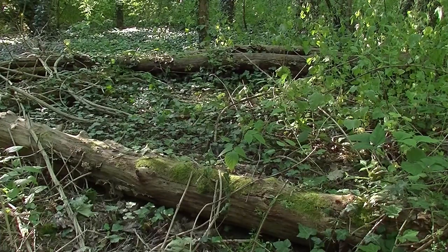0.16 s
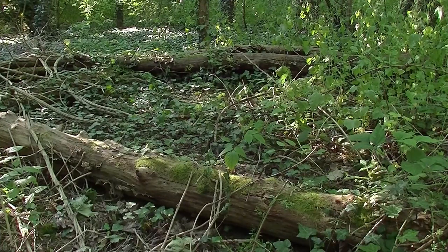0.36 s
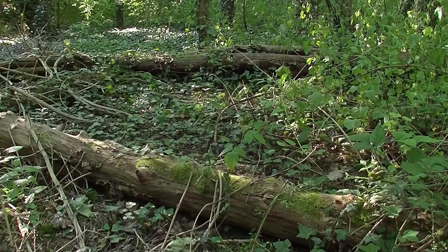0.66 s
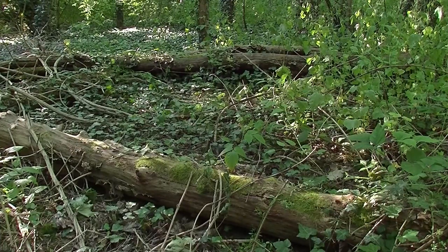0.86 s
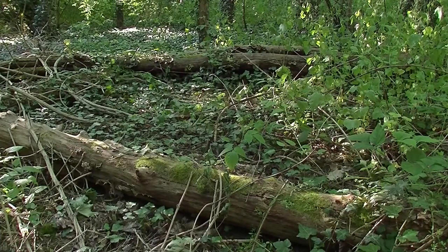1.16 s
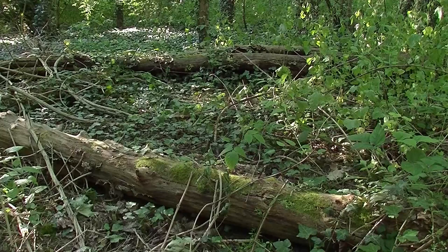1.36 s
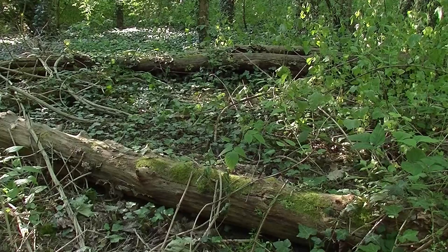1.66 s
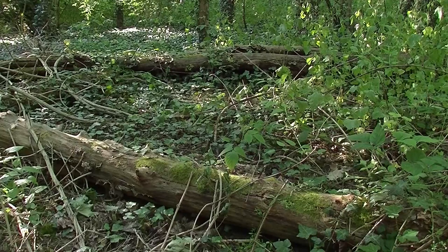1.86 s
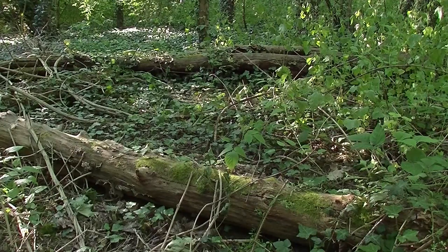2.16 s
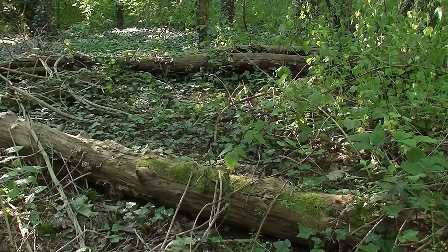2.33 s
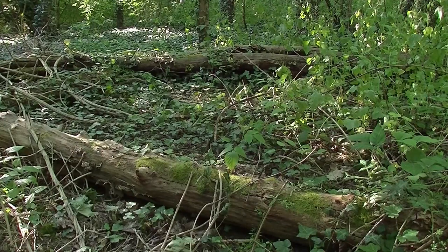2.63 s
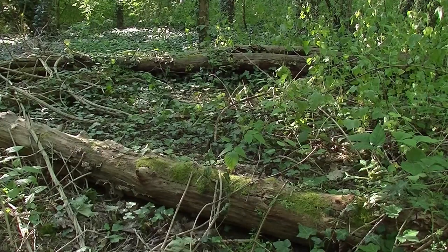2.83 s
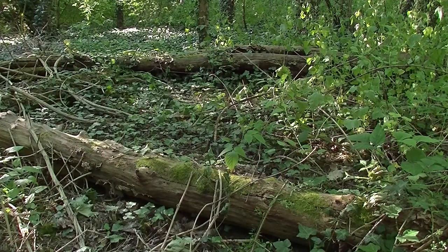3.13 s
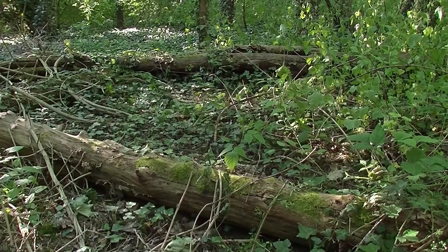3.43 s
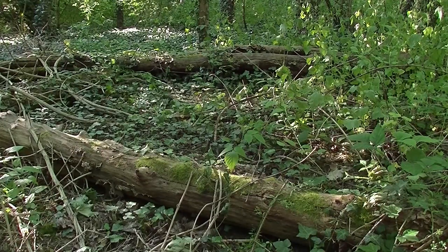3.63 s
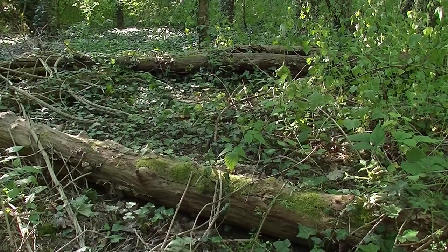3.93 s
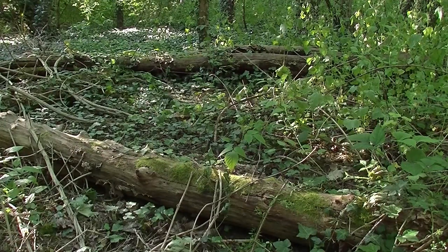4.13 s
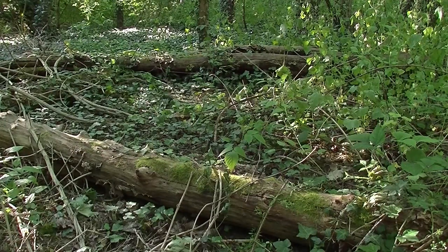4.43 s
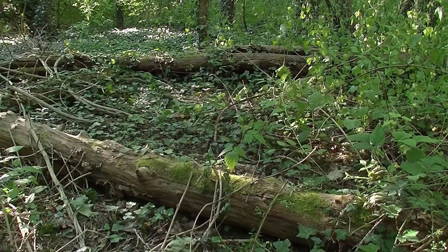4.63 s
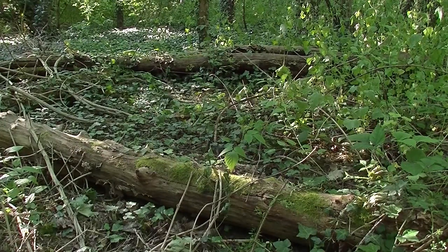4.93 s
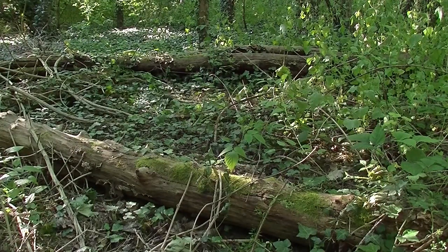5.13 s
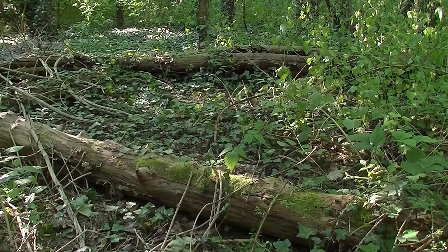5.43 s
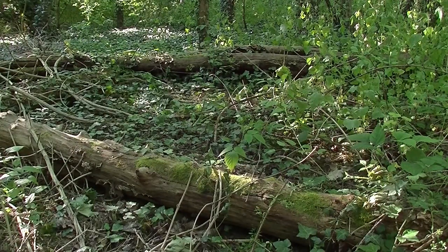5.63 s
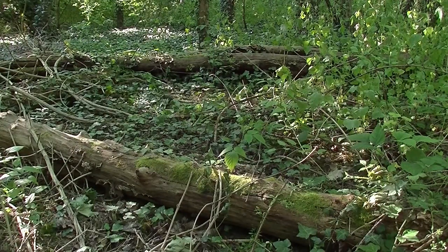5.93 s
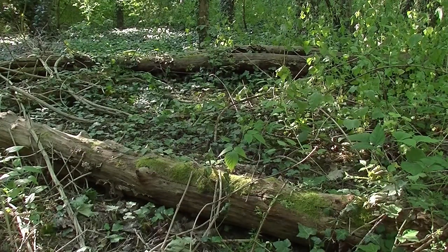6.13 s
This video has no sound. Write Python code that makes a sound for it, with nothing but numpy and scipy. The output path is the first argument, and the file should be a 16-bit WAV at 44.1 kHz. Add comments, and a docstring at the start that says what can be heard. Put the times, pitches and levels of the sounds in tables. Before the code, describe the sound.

A songbird trills some way off in a leafy wood over faint warbling, then a close bird chirps, buzzes and whistles above soft hush.

```python
"""Songbirds in a leafy wood

One bird trills some way off and fainter voices warble behind it; then a close bird chirps, buzzes and whistles.
Every note is a gliding sine with two faint overtones; quick pitch swings make the buzzes.
Random echoes stand for the trunks and leaves that scatter the notes into a tail.
Filtered noise makes a soft steady hush, and a high sine the camera's thin whine."""
import sys
import numpy as np
from scipy import signal
from scipy.fft import rfft, irfft
from scipy.io import wavfile
from scipy.ndimage import uniform_filter1d

SR = 44100
rng = np.random.default_rng(int(sys.argv[2]) if len(sys.argv) > 2 else 0)


def inscribe(sig):
    """Save sig as 16-bit PCM at rate SR to the path in sys.argv[1].

    A 1-D sig is mono; a 2-D sig holds one channel per row.
    Samples are clipped to [-1, 1] before scaling.
    """
    pcm = np.round(np.clip(np.atleast_2d(sig).T, -1, 1) * 32767)
    wavfile.write(sys.argv[1], SR, pcm.astype(np.int16))


N = 276948
TIME = np.arange(N) / SR  # s

# Note levels are source levels, ahead of fades, filtering, echoes and mix gains.
# Spectra list relative density; noise() evens out their overall level.

# Colour of the far hush: hz, density_db
HUSH_SPECTRUM = [(25, -25), (50, -10), (80, -4), (125, 0), (200, -1.5), (330, -5), (490, -0.5), (780, -5.5),
                 (1000, -9), (1400, -17), (2000, -22.5), (4000, -48)]
# Colour of the fine hiss: hz, density_db
HISS_SPECTRUM = [(1000, -12), (2000, 0), (3000, -2), (4500, -1.5), (7000, -10.5), (11000, -13.5),
                 (15500, -11.5)]
# How alike left and right are in the noises: hz, likeness (0 to 1)
STEREO_LIKENESS = [(50, 0.94), (600, .95), (1500, 0.76), (4000, 0.66), (12000, .65)]
# Base ring time of the wood, scaled for each source by linger: hz, t60_s
WOOD_RING = [(2000, 0.52), (3500, 0.72), (5500, 0.97), (7000, 0.81), (9000, 0.74), (15000, 0.37)]
# Colour of an earlier trill's echo: hz, density_db
ECHO_SPECTRUM = [(3500, -47), (4700, -0.5), (5800, 2), (6900, -7), (7800, -40)]

# The fainter warbling's figures, one row a note; a high bend glides early, then holds:
# after_start_s, length_s, first_pitch_hz, last_pitch_hz, bend, level_db
STEP_DOWN_FIGURE = [(0, .03, 3840, 3050, 2.1, -62.5), (.04, 0.0604, 2790, 2414, 2.2, -60.5)]
TWIRL_FIGURE = [(0, 0.033, 2650, 3350, .3, -56.5), (.027, 0.029, 3180, 2420, 1.57, -57.5),
                (.072, .06, 3980, 3480, 4.5, -54)]
FLICK_FIGURE = [(0.011, 0.0384, 3100, 3850, 1.98, -48.5)]
TOOT_FIGURE = [(0.00076, 0.069, 2140, 2180, 1.3, -54.5)]
# Single slurs among them: start_s, length_s, first_pitch_hz, last_pitch_hz, level_db
SINGLE_SLURS = [(1.637, 0.057, 3640, 3490, -58.5), (2.083, 0.046, 3600, 2700, -53.5),
                (2.301, 0.043, 2660, 2183, -53.5), (2.589, 0.076, 2930, 2087, -57),
                (2.649, 0.038, 4350, 4010, -48), (2.779, 0.061, 3410, 2910, -54),
                (2.993, 0.043, 2530, 2530, -51.5), (3.114, 0.066, 2630, 2900, -57),
                (3.173, 0.043, 3140, 3266, -52.5), (3.272, 0.056, 3000, 2580, -57),
                (3.467, 0.11, 3456, 3585, -56), (3.95, 0.043, 2475, 2590, -64),
                (4.013, 0.13, 2830, 2574, -60), (4.442, 0.045, 3080, 3480, -66.5)]

# The two trill syllables, an arch and a swoop: after_start_s, pitch_hz, relative_level_db
ARCH_SYLLABLE = [(0, 3950, -25), (.012, 4700, 0.5), (.028, 6000, -6.5), (.045, 6480, -1), (.07, 6620, -3),
                 (.083, 6550, -47), (.118, 5800, -17), (.128, 5170, 1.5), (.157, 3880, -7)]
SWOOP_SYLLABLE = [(0, 6200, -6), (.015, 7870, -13), (.035, 8117, -9.5), (.055, 8120, -12.5),
                  (.075, 7420, -7.5), (.1, 6350, -2), (.122, 5280, -1), (.143, 4030, -8.5)]
# When each syllable is sung: start_s, level_db
ARCH_TIMES = [(.281, -43), (.474, -43), (.666, -43), (.857, -43.5), (1.047, -44)]
SWOOP_TIMES = [(3.098, -45), (3.288, -45), (3.485, -45), (3.683, -45.5)]
# The trilling bird's notes that slide onto a pitch, most holding it, a few just quick upward flicks:
# start_s, length_s, first_pitch_hz, target_pitch_hz, level_db
SLIDING_NOTES = [(0.19, 0.032, 6200, 7570, -48.5), (1.323, 0.058, 5100, 4150, -48.5),
                 (1.451, 0.12, 7750, 7220, -50.5), (1.541, 0.036, 4280, 4290, -54.5),
                 (2.18, 0.04, 6900, 8340, -56), (2.962, 0.011, 5400, 8250, -55),
                 (1.858, 0.091, 6400, 5060, -45), (2.031, 0.054, 4750, 5574, -44),
                 (2.437, 0.0368, 5850, 6720, -43.5), (2.478, 0.044, 6580, 6480, -40),
                 (2.965, 0.072, 7000, 5330, -43)]
# Its downslurs: start_s, first_pitch_hz, last_pitch_hz, level_db
FALLING_NOTES = [(0.222, 7480, 6670, -51), (1.582, 5790, 4460, -49), (2.105, 5850, 4120, -47.5),
                 (2.207, 8400, 6880, -51), (2.264, 6300, 3350, -46)]

# The close bird's chirps, a clear note that breaks into a rough climb:
# start_s, length_s, pitch_hz, level_db, climb_length_s, climb_top_hz, climb_level_db
CHIRP_NOTES = [(4.678, 0.033, 3565, -33, 0.052, 4400, -30.5), (4.783, .028, 4030, -25.5, .03, 4684, -33.5),
               (4.874, .038, 4057, -29.5, 0.029, 4985, -35)]
# Its rasps: start_s, length_s, first_pitch_hz, last_pitch_hz, level_db, pitch_swing_hz
RASP_NOTES = [(4.611, 0.061, 4710, 3470, -41.5, 600), (6.12, 0.031, 4450, 4380, -51.5, 107)]
# Its upsweeps, all from one low foot: start_s, length_s, top_hz, level_db
UPSWEEP_NOTES = [(4.976, .03, 4250, -35.5), (6.053, 0.023, 3470, -38.5), (6.234, 0.034, 3300, -34.5)]
# Its whistles, all sliding onto one pitch: start_s, length_s, level_db
WHISTLE_NOTES = [(6.047, 0.03, -37), (6.066, 0.0946, -25.5), (6.257, 0.071, -26.5)]
# Lower voice of its buzzes, squeaks that mostly fall:
# start_s, length_s, first_pitch_hz, last_pitch_hz, level_db
SQUEAK_NOTES = [(5.327, 0.025, 6570, 6760, -51.5), (5.338, 0.052, 7280, 7230, -37),
                (5.36, 0.091, 7340, 6490, -35.5), (5.539, .026, 7280, 7250, -39.5),
                (5.558, 0.023, 8400, 6390, -33), (5.589, 0.015, 6030, 5960, -41.5),
                (5.752, 0.048, 7974, 7210, -32.5), (5.801, 0.012, 6830, 6720, -38),
                (5.826, 0.056, 7640, 7080, -37.5), (5.929, 0.049, 7670, 7280, -36)]
# Upper voice, a rattle about a steady pitch: start_s, length_s, pitch_hz, level_db, pitch_swing_hz
RATTLE_NOTES = [(4.278, .04, 8250, -73, 150), (4.302, 0.053, 8260, -55, 454),
                (4.429, 0.071, 8500, -57.5, 220), (5.384, 0.095, 7700, -40.5, 640),
                (5.573, 0.11, 7520, -40, 1160), (5.788, 0.13, 7980, -43.5, 960),
                (5.94, 0.032, 8470, -42, 600)]

HUSH_DB, HISS_DB = -58.5, -70
WHINE_HZ, WHINE_DB = 14605, -86
EDGE_HZ = 15850  # top of the camera's band
SETTLE_S = 0.019  # time constant of the slide onto a pitch
FALL_HZ_PER_S = 50000  # average speed of every downslur
SCOOP_HZ = 176  # a chirp starts this much flat
BREAK_SHARE, STEP_HZ = 0.67, 286  # the climb starts at this share of the note, this much higher
FOOT_HZ = 2403
WHISTLE_FROM_HZ, WHISTLE_HZ = 3250, 3633
SQUEAK_SWING_HZ, SQUEAK_SWINGS_PER_S = 231, 221
RATTLE_SWINGS_PER_S = 156


def amp(db):
    """Decibels to gain."""
    return 10 ** (np.asarray(db) / 20)


def evened(x):
    """Scales to rms 1."""
    return x / np.sqrt(np.mean(x ** 2) + 1e-20)


def read(points, hz):
    """Reads a spectrum on a log-frequency axis."""
    f, value = np.transpose(points)
    return np.interp(np.log(hz + 1), np.log(f), value)


def add(mix, start_s, sound):
    """Mixes a sound in at its start time."""
    part = mix[max(round(start_s * SR), 0):][:len(sound)]
    part += sound[:len(part)]


def drift(size, rate):
    """Random wander: unit normal values, rate of them a second, joined by straight lines."""
    knots = rng.standard_normal(256)
    return np.interp(np.arange(size) * rate / SR, np.arange(len(knots)), knots)


def placed(x, right_db):
    """Leans a sound to the right by a level difference between the channels."""
    return x * amp([[-right_db / 2], [right_db / 2]])


def noise(spectrum):
    """Steady coloured noise, most alike in the two channels at low pitch."""
    hz = np.fft.rfftfreq(N, 1 / SR)
    mid, side = rfft(rng.standard_normal((2, N))) * amp(read(spectrum, hz))
    same = np.clip(read(STEREO_LIKENESS, hz), 0, 1)
    side = side * np.sqrt((1 - same) / (1 + same))
    left_right = np.array([mid + side, mid - side])
    return evened(irfft(left_right, N))


def wood(x, early_db, early_s, tail_db, right_db, linger, spread=.25):
    """Nearby leaves and ground scatter a note at once; far trunks build a tail, stretched by linger."""
    t = TIME[:SR]
    # sparse random echoes, about 2500 a second: (early, tail) x (mid, side)
    taps = rng.standard_normal((2, 2, SR)) * (rng.random((2, 2, SR)) < 2500 / SR)
    early = taps[0] * np.exp(-t / early_s) * (t > .002)

    # each frequency of the tail dies away at its own speed
    hz, at, bands = signal.stft(taps[1], SR, nperseg=256)
    t60 = linger * read(WOOD_RING, hz)[:, None]
    tail = signal.istft(bands * amp(-60 * at / t60), SR, nperseg=256)[1][:, :SR]
    tail = tail * -np.expm1(-t / 0.025)  # builds up gradually

    early = amp(early_db) * early / np.linalg.norm(early[0])
    tail = amp(tail_db) * tail / np.linalg.norm(tail[0])
    mid, side = signal.fftconvolve(x[None], early + tail, axes=1)[:, :N]
    return placed(x + mid + spread * np.array([side, -side]), right_db)


def syrinx(hz, level, wobble, overtone_db):
    """A nearly pure whistle, slightly unsteady, with two faint overtones."""
    phase = 2 * np.pi * np.cumsum(hz * (1 + wobble * drift(len(hz), 403.6))) / SR
    overtones = sum(np.sin(k * phase) * (k * hz < SR / 2) for k in (2, 3))
    return np.sqrt(2) * level * (np.sin(phase) + amp(overtone_db) * overtones)


def song(rows, soft, wobble, overtone_db, throb_db_per_khz=6, fade_db=0):
    """Each note glides between two pitches; a buzzy one also swings quickly and unevenly about its glide."""
    out = np.zeros(N)
    for start_s, length, first_hz, last_hz, bend, db, *buzz in rows:
        u = np.linspace(0, 1, int(length * SR))  # progress through the note
        glide = np.expm1(-bend * u) / np.expm1(-bend)
        hz = first_hz + (last_hz - first_hz) * glide
        level = amp(db + fade_db * u) * signal.windows.tukey(len(u), min(soft, 1))
        if buzz:
            swing_hz, rate = buzz
            turn = 2 * np.pi * np.cumsum(rate * (1 + 0.238 * drift(len(u), 150))) / SR
            hz = hz + swing_hz * np.sin(turn)
            # each swing is loudest on its way down, so a wide buzz breaks into pulses
            throb_db = -throb_db_per_khz * swing_hz / 1000 * np.cos(turn)
            level = level * evened(amp(throb_db))
        add(out, start_s, syrinx(hz, level, wobble, overtone_db))
    return out


def background():
    """The far hush of the wood and a fine hiss, both shaped noise, with the camera's whine as a sine."""
    hush = amp(HUSH_DB + 0.11 * drift(N, 3)) * noise(HUSH_SPECTRUM)
    hiss = amp(HISS_DB) * noise(HISS_SPECTRUM)
    whine = amp(WHINE_DB) * np.sqrt(2) * np.sin(2 * np.pi * WHINE_HZ * TIME)
    return placed(hush, right_db=2.5) + placed(hiss + whine, right_db=0.0)


def earlier_echo(level_db=-57, fall_db=45):
    """The last of an earlier trill dies away among the trees: noise falling by fall_db a second."""
    return placed(amp(level_db - fall_db * TIME) * noise(ECHO_SPECTRUM), right_db=3.5)


def far_chatter(start_s=1.1, end_s=3.9, level_db=-68, count=42):
    """Random short slurs from deep in the wood follow one another, blurred into a murmur."""
    when, length, pitch, slide, size = rng.random((count, 5)).T
    starts = start_s + (end_s - start_s) * (np.arange(count) + when) / count
    lengths = 0.031 + 0.0355 * length
    first_hz = 2600 + 850 * pitch
    last_hz = first_hz * np.where(slide < .5, .82, 1.15)  # down or up
    rows = np.transpose([starts, lengths, first_hz, last_hz, np.ones(count), level_db - 5 * size])
    slurs = song(rows, soft=0.52, wobble=.03, overtone_db=-59)
    return wood(slurs, early_db=0.5, early_s=0.022, tail_db=3.5, right_db=1.5, linger=1.3)


def repeated(figure, start_s, period_s, count, step_db=0):
    """The notes of a figure sung several times at an even pace, changing by step_db each time."""
    return [(start_s + k * period_s + after_s, *glide, db + k * step_db)
            for k in range(count) for after_s, *glide, db in figure]


def warbling_voices(slur_bend=0.76):
    """Short gliding figures sung two or three times, among single slurs."""
    notes = [(s, length, first, last, slur_bend, db) for s, length, first, last, db in SINGLE_SLURS]
    notes += repeated(STEP_DOWN_FIGURE, start_s=1.1, period_s=.203, count=2, step_db=2.0)
    notes += repeated(TWIRL_FIGURE, start_s=1.698, period_s=.204, count=2)
    notes += repeated(FLICK_FIGURE, start_s=2.727, period_s=0.067, count=3, step_db=-0.6)
    toots = repeated(TOOT_FIGURE, start_s=5.082, period_s=.086, count=2, step_db=-7)
    warble = song(notes, soft=0.29, wobble=0.019, overtone_db=-48)
    return warble + song(toots, soft=0.29, wobble=0.0073, overtone_db=-40)


def trill(syllable, rows):
    """One syllable sung over and over, its pitch and level following a drawn curve."""
    at, hz, db = np.transpose(syllable)
    t, out = np.arange(0, at[-1], 1 / SR), np.zeros(N)
    pitch = uniform_filter1d(np.interp(t, at, hz), size=300, mode="nearest")  # rounds the corners
    level = amp(np.interp(t, at, db)) * signal.windows.tukey(len(t), .05)
    for start_s, level_db in rows:
        add(out, start_s, syrinx(pitch, level * amp(level_db), wobble=0.0059, overtone_db=-40))
    return out


def trilling_bird(fall_bend=0.67):
    """Two trills; around them, swelling notes that slide onto a pitch or flick up, and quick downslurs."""
    slides = [(s, length, first, target, length / SETTLE_S, db)
              for s, length, first, target, db in SLIDING_NOTES]
    falls = [(s, (first - last) / FALL_HZ_PER_S, first, last, fall_bend, db)
             for s, first, last, db in FALLING_NOTES]
    trills = trill(ARCH_SYLLABLE, ARCH_TIMES) + trill(SWOOP_SYLLABLE, SWOOP_TIMES)
    sliding = amp(-2) * song(slides, soft=0.26, wobble=0.0054, overtone_db=-45, fade_db=3.0)
    downslurs = song(falls, soft=0.32, wobble=.005, overtone_db=-41)
    return trills + sliding + downslurs


def chirping(clear_swing_hz=60, rough_swing_hz=170, swings_per_s=150):
    """The close bird's low register: two lone rasps, stepped chirps, upsweeps and fading whistles."""
    notes = [(s, length, FOOT_HZ, top, .6, db) for s, length, top, db in UPSWEEP_NOTES]
    for s, length, hz, db, climb_s, top, climb_db in CHIRP_NOTES:
        clear = (s, length, hz - SCOOP_HZ, hz, 2.5, db, clear_swing_hz, swings_per_s)
        break_s = s + BREAK_SHARE * length
        climb = (break_s, climb_s, hz + STEP_HZ, top, 1.3, climb_db, rough_swing_hz, swings_per_s)
        notes += [clear, climb]
    rasps = [(s, length, first, last, .3, db, swing, swings_per_s)
             for s, length, first, last, db, swing in RASP_NOTES]
    whistles = [(s, length, WHISTLE_FROM_HZ, WHISTLE_HZ, 8, db, clear_swing_hz, swings_per_s)
                for s, length, db in WHISTLE_NOTES]
    return (song(notes, soft=0.51, wobble=0.0079, overtone_db=-39)
            + song(rasps, soft=0.21, wobble=0.017, overtone_db=-38)
            + song(whistles, soft=0.083, wobble=0.016, overtone_db=-44, fade_db=-6))


def beak(x, low_hz):
    """A small beak radiates low pitches poorly: two equal high-pass stages in a row."""
    stage = signal.butter(N=2, Wn=low_hz, btype="high", fs=SR, output="sos")
    return signal.sosfilt(stage.repeat(2, axis=0), x)


def buzzing():
    """The close bird's high register: the two sides of its syrinx squeak and rattle, often at once."""
    squeaks = [(s, length, first, last, 1.1, db, SQUEAK_SWING_HZ, SQUEAK_SWINGS_PER_S)
               for s, length, first, last, db in SQUEAK_NOTES]
    rattles = [(s, length, hz, hz, 1, db, swing, RATTLE_SWINGS_PER_S)
               for s, length, hz, db, swing in RATTLE_NOTES]
    return (song(squeaks, soft=0.34, wobble=0.0095, overtone_db=-38, throb_db_per_khz=14)
            + song(rattles, soft=0.43, wobble=.01, overtone_db=-38, throb_db_per_khz=7.5))


def fizz(x, fizz_db=-21):
    """A faint wide fizz rides on the high buzzy notes: noise that follows their level."""
    level = np.sqrt(abs(uniform_filter1d(x[0] ** 2, size=400)))
    colour = [(1000, -15.5), (4000, -7.5), (9500, 0), (11500, 3), (15500, -3.5)]  # hz, density_db
    return amp(fizz_db) * level * noise(colour)


def scene():
    """Birds at several distances, each with its own echoes, over the background."""
    warblers = amp(-2.23) * wood(warbling_voices(), early_db=-6, early_s=0.013, tail_db=-6, right_db=2,
                                 linger=0.98)
    triller = amp(-1.75) * wood(trilling_bird(), early_db=-2, early_s=0.037, tail_db=-3.0, right_db=3.5,
                                linger=0.84)
    chirps = beak(chirping(), low_hz=3190)
    chirper = amp(1.0) * wood(chirps, early_db=-3.5, early_s=0.033, tail_db=-8.5, right_db=1.4, linger=0.79)
    buzzer = amp(0.43) * wood(buzzing(), early_db=0.5, early_s=0.037, tail_db=-7.5, right_db=1.2, linger=0.68)
    distance = background() + earlier_echo() + far_chatter()
    return distance + warblers + triller + chirper + buzzer + fizz(buzzer)


def record(dry):
    """The camera's band limit, a steep low-pass, with very short fades at both ends."""
    low_pass = signal.firwin(511, EDGE_HZ, window=("kaiser", 9), fs=SR)
    ends = signal.windows.tukey(N, .001)
    return signal.oaconvolve(dry * ends, low_pass[None], "same")


dry = scene()
out = record(dry)
inscribe(out)
```